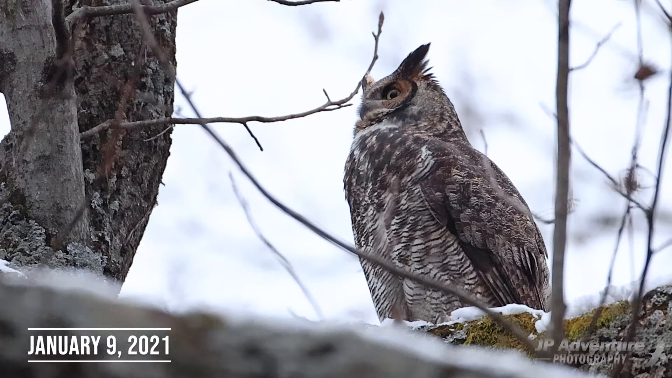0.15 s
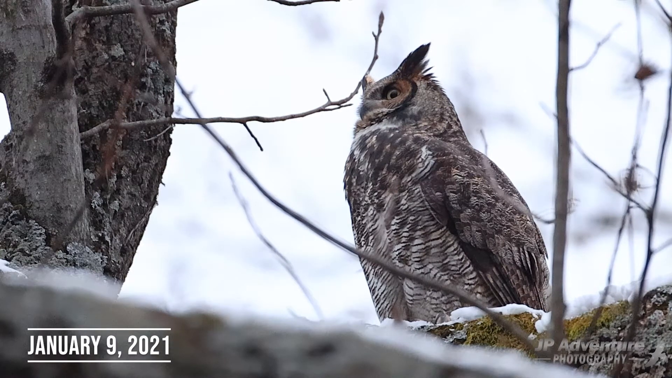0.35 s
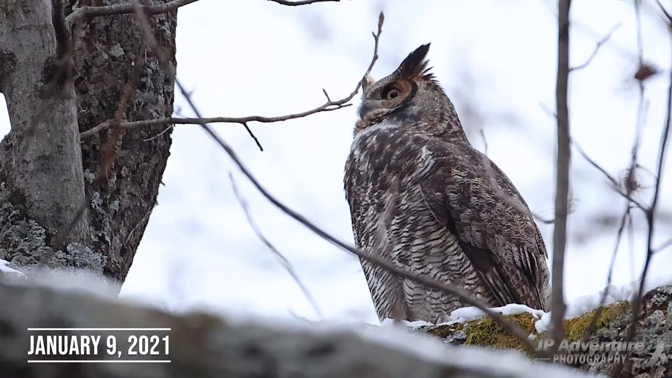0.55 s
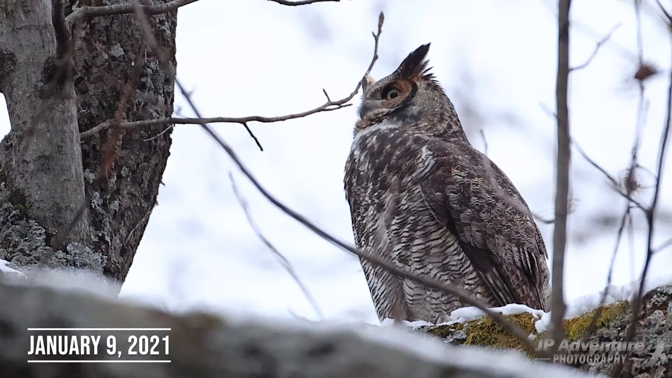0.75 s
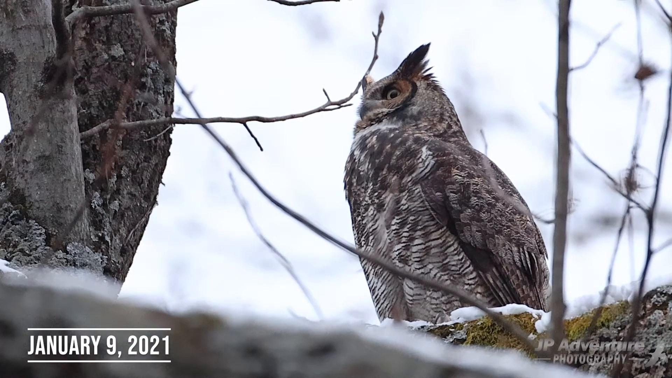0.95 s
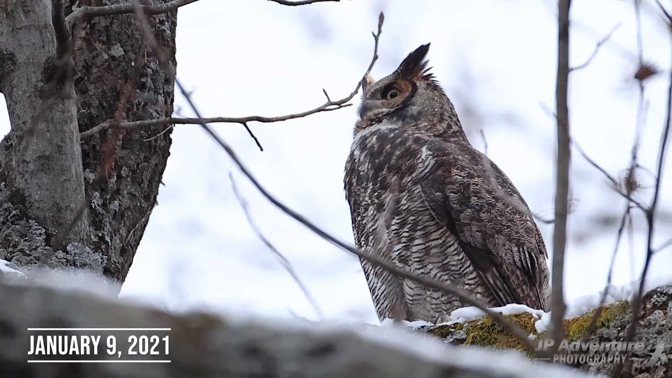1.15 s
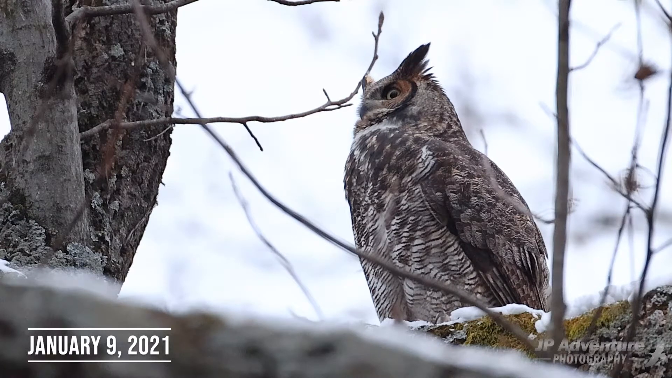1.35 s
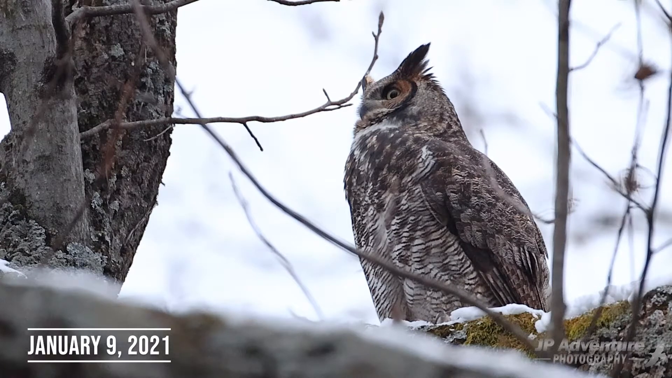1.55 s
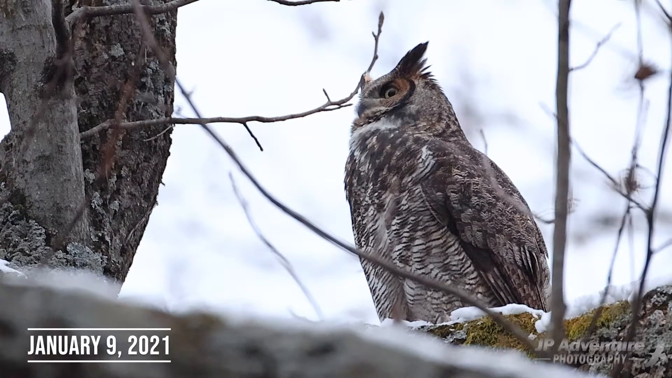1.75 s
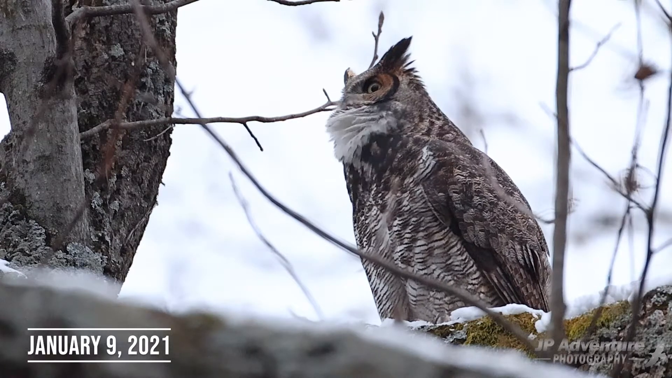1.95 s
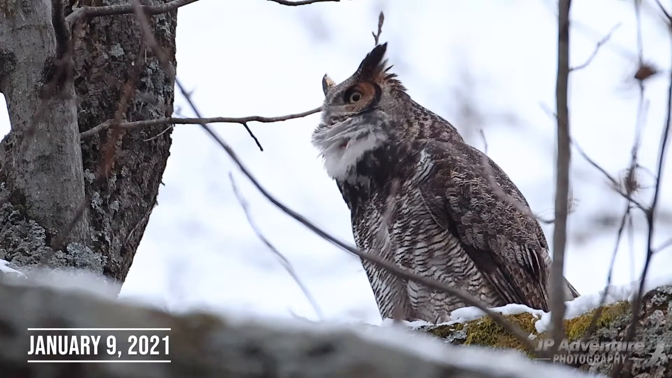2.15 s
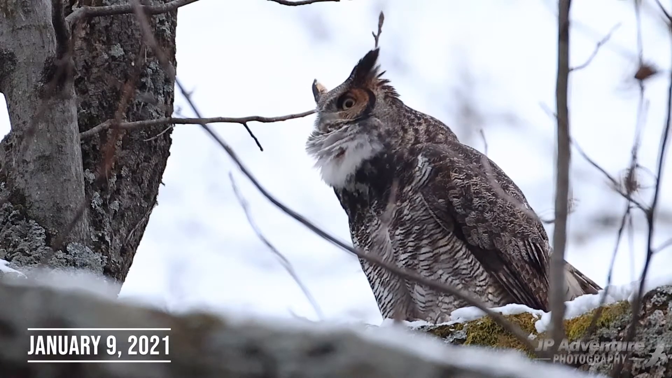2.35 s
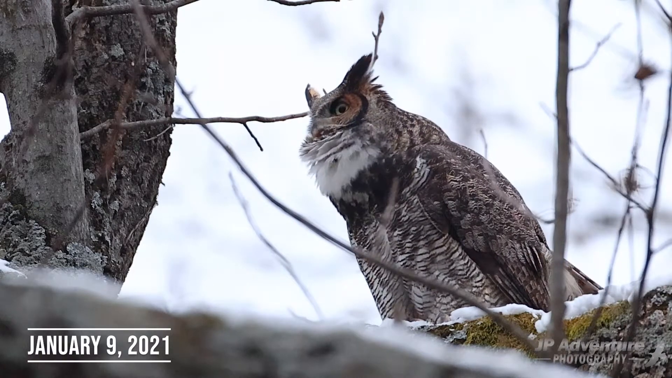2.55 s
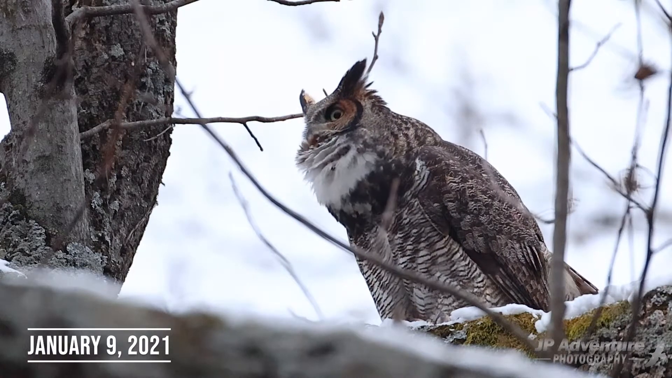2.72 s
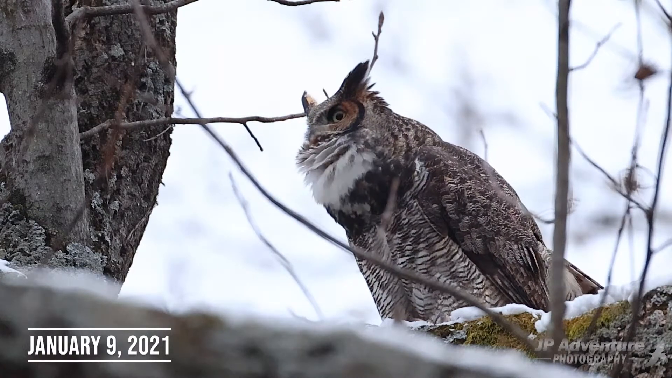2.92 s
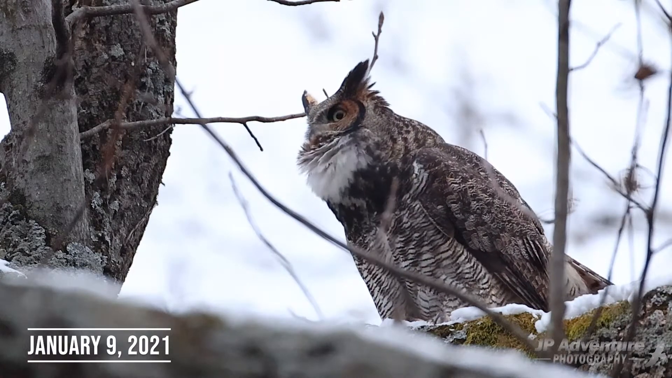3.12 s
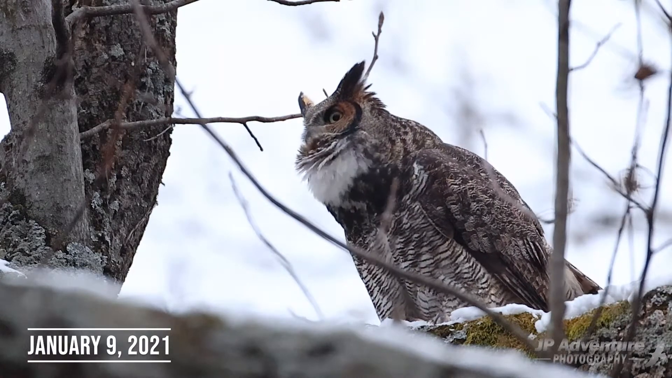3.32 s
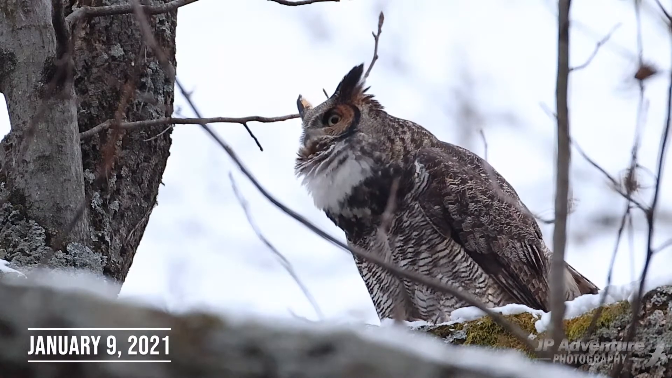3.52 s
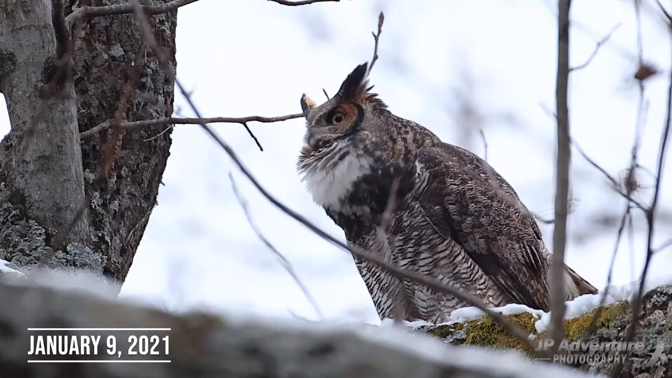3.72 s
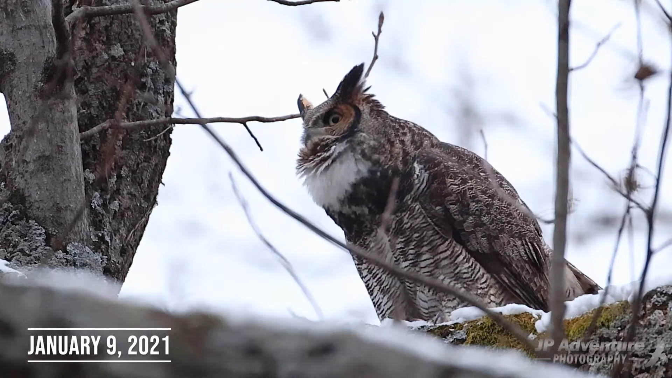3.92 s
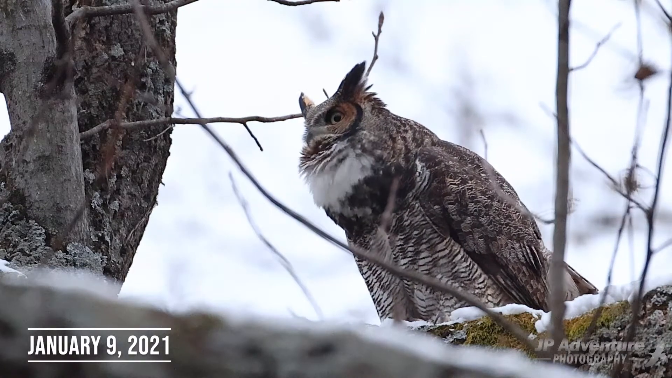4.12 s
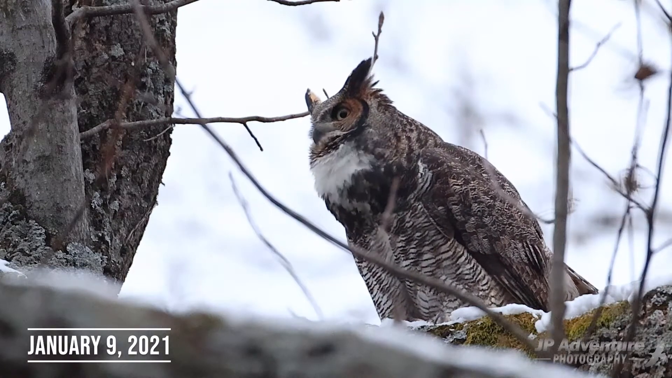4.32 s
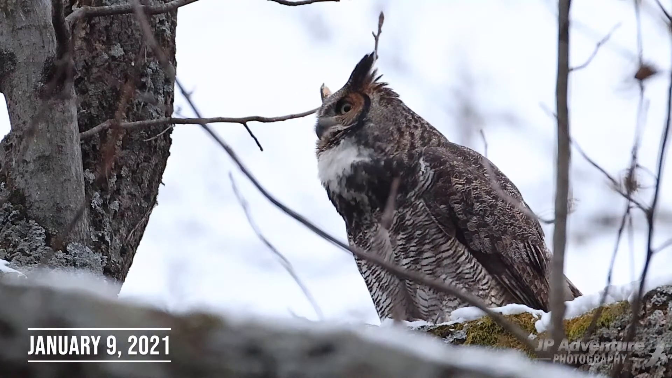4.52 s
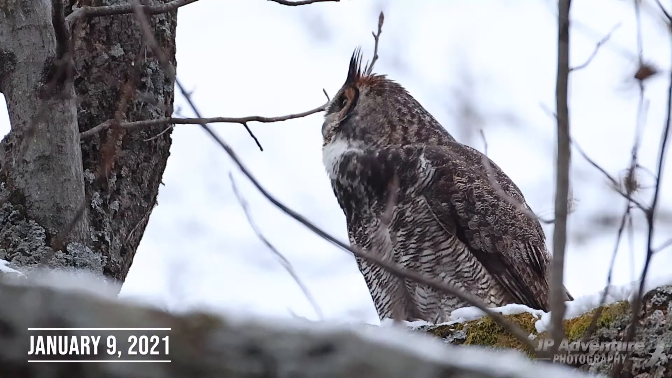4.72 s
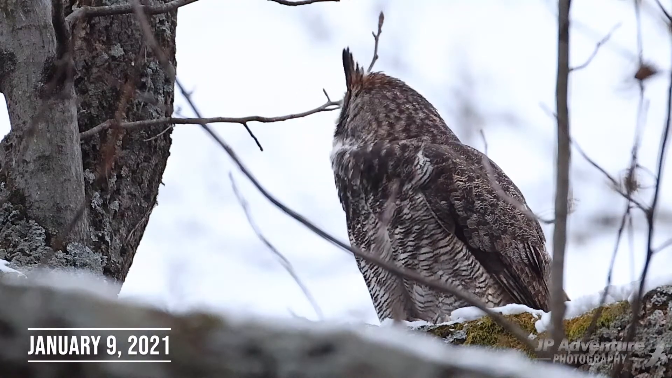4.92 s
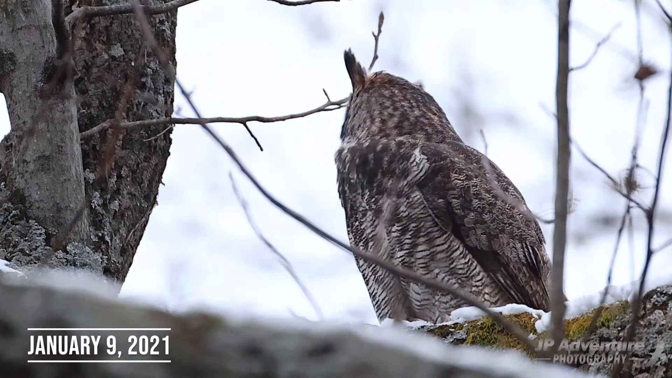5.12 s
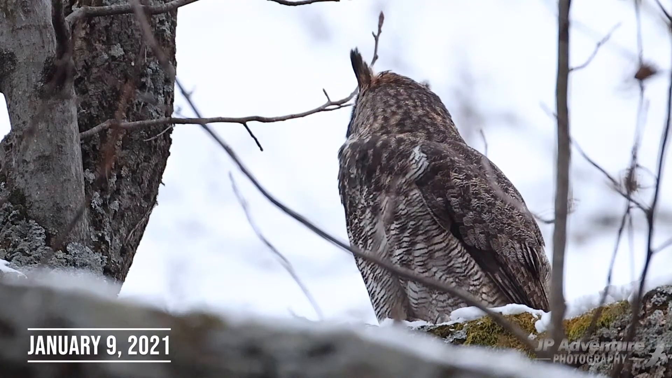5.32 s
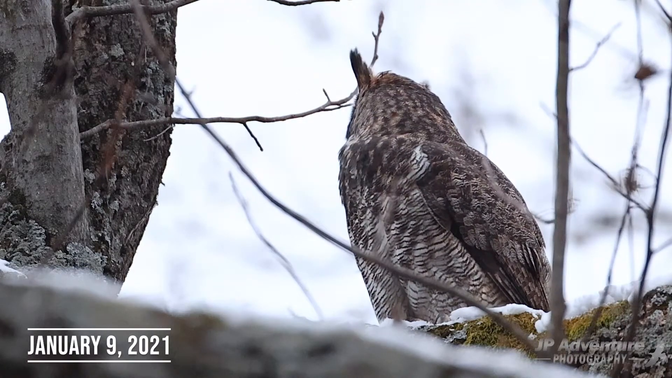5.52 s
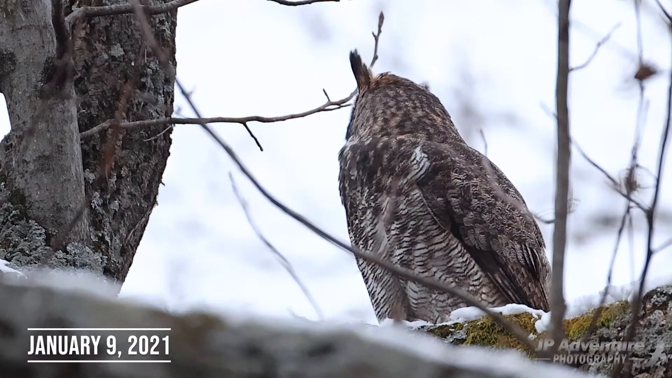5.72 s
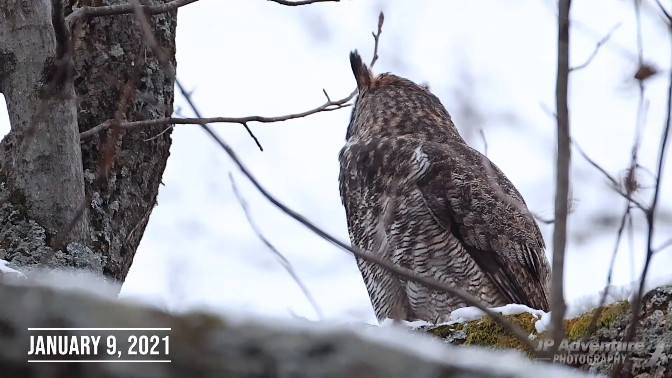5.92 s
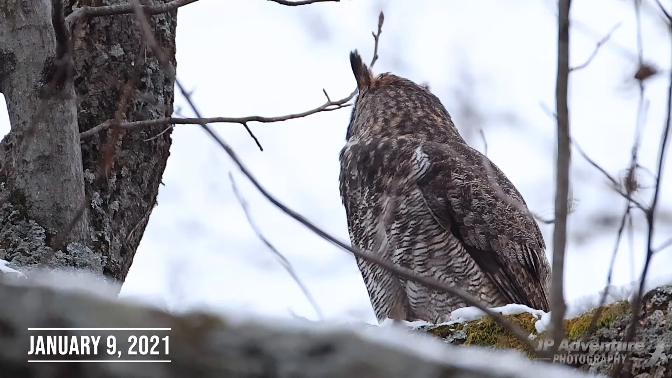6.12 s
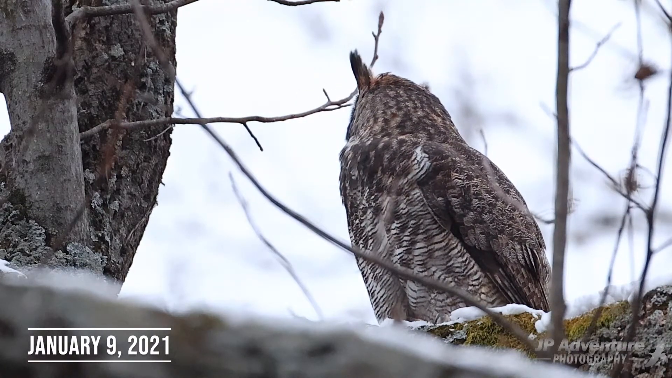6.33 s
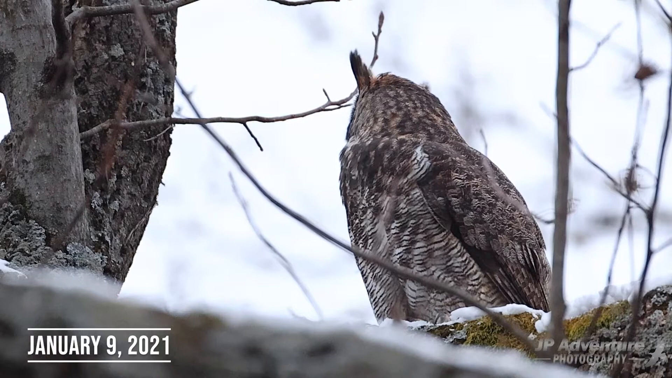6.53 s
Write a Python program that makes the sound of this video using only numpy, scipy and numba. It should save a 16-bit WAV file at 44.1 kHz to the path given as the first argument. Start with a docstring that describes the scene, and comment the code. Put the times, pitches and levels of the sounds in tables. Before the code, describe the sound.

An owl gives a run of deep, mellow hoots in the woods while twigs and ice crack over faint, faraway traffic.

```python
"""In snowy woods, a great horned owl hoots one phrase of seven notes from a branch.
Each hoot is a nearly pure tone, driven by pushes of air and coloured by the resonance of the throat.
Twigs and ice snap and ring, a small bird calls twice far off, and the trees scatter these sounds back.
Behind them lie a distant wash of air and traffic, a low hum, puffs of breeze and one dry click.
An automatic gain control pushes the wash down under each hoot and lets it swell back."""
import sys
import numpy as np
from scipy import signal
from scipy.fft import rfft, irfft
from scipy.io import wavfile
from scipy.ndimage import uniform_filter1d
from numba import njit

SR = 44100
rng = np.random.default_rng(int(sys.argv[2]) if len(sys.argv) > 2 else 0)


def master_out(mix):
    """Clip the mix to full scale and print it as 16-bit PCM to the path in sys.argv[1]."""
    frames = np.transpose(np.atleast_2d(mix))
    ceiling = np.clip(frames, -1, 1)
    pcm = np.round(ceiling * 32767).astype(np.int16)
    wavfile.write(sys.argv[1], SR, pcm)


N = 294147
TIME = np.arange(N) / SR
WASH_DB = -28.5


def gain_of(db):
    """Amplitude ratio of a level in decibels."""
    return 10 ** (np.asarray(db) / 20)


def unit_rms(x):
    """Normalisation to unit mean power."""
    return x / np.sqrt(np.mean(x ** 2) + 1e-20)


def add(mix, start_s, sound):
    """Superposition: a sound sums into the mix from its start time."""
    part = mix[round(start_s * SR):][:len(sound)]
    part += sound[:len(part)]


def band(x, low_hz, high_hz, order=2):
    """Causal band-pass, its upper edge held below half the sample rate."""
    edges_hz = [low_hz, min(high_hz, SR * .49)]
    return signal.sosfilt(signal.butter(order, edges_hz, "band", fs=SR, output="sos"), x)


def drift(size, rate_hz):
    """Random modulation: low-passed noise of about unit rms."""
    hz = np.fft.rfftfreq(N, 1 / SR)
    spectrum = rfft(rng.standard_normal(N)) / (1 + (hz / rate_hz) ** 4)
    return unit_rms(irfft(spectrum, N))[:size]


def woods(x, t60_s, rise_s, dull_hz=11500):
    """Multiple scattering by branches: sparse reflections build up, then decay, the treble first."""
    taps = rng.standard_normal(SR) * (rng.random(SR) < 8000 / SR)  # about 8000 reflections a second
    taps *= 1 - np.exp(-TIME[:SR] / rise_s)
    hz, t, spectra = signal.stft(taps, SR, nperseg=128)
    decay_db = -60 * t / t60_s * (1 + (hz[:, None] / dull_hz) ** 3)
    response = signal.istft(spectra * gain_of(decay_db), SR, nperseg=128)[1]
    return signal.fftconvolve(x, response / np.linalg.norm(response))[:N]


def wash(patchy_db=.82, swell_db=-.34):
    """Ambient noise of far air and traffic: a dull spectrum with drifting patches below, hiss above."""
    # noise spectrum ahead of the band-pass: (frequency [Hz], relative spectral density [dB])
    wash_spectrum = [(22, -31.5), (33, -24.5), (46, -11.5), (62, -0.5), (100, -0.5), (200, -9),
                     (400, -12.5), (630, -10), (960, -10.5), (1410, -18), (2000, -27.5), (2700, -37.5),
                     (6700, -41), (15500, -45)]
    knot_hz, knot_db = np.transpose(wash_spectrum)
    frames, hz = N // 512 + 5, np.fft.rfftfreq(2048, 1 / SR)
    real, imag, patches = rng.standard_normal((3, frames, len(hz)))
    patches = uniform_filter1d(patches, size=10, axis=0)  # smooth in time
    patches = unit_rms(uniform_filter1d(patches, size=12, axis=1))  # and in frequency
    density_db = np.interp(np.log(hz + 1), np.log(knot_hz), knot_db)
    field_db = density_db + patchy_db * patches / (1 + (hz / 2500) ** 2)
    spectra = (real + 1j * imag) * gain_of(field_db)
    noise = signal.istft(spectra.T, nperseg=2048, noverlap=1536)[1][:N]
    return gain_of(WASH_DB + swell_db * drift(N, 6.3)) * unit_rms(band(noise, 50, 20000, order=3))


def drone(hz=95, width_hz=9, db=-41):
    """Narrow-band noise: random amplitude modulation makes a low tone waver like a far road."""
    return gain_of(db) * np.sqrt(2) * drift(N, width_hz) * np.sin(2 * np.pi * hz * TIME)


def breeze(low_hz=38, high_hz=165):
    """Turbulent pressure on the microphone: low noise in soft, bell-shaped buffets."""
    # puffs of air: (time [s], standard deviation in time [s], level [dB])
    puffs = [(5.133, 0.047, -44), (5.243, 0.035, -26), (5.484, 0.028, -28), (5.605, 0.14, -40.5)]
    strength = sum(gain_of(db) * np.exp(-((TIME - s) / width) ** 2 / 2) for s, width, db in puffs)
    return strength * unit_rms(band(rng.standard_normal(N), low_hz, high_hz, order=3))


def far_bird(arch=.22, hoarse=.077, direct_db=-4, scatter_gain=2):
    """Frequency modulation gives a hoarse, arched note; far off, scattered sound outweighs direct."""
    # calls: (time [s], duration [s], pitch [Hz], level before the path gains [dB])
    chirps = [(1.142, 0.023, 3600, -47), (6.153, 0.041, 3495, -46.5)]
    out = np.zeros(N)
    for start, length, hz, db in chirps:
        arc = np.sqrt(abs(np.sin(np.linspace(0, np.pi, int(length * SR)))))
        pitch_hz = hz * (1 + arch * (arc - .8) + hoarse * drift(len(arc), 300))
        note = gain_of(db) * np.sqrt(2) * arc * np.sin(2 * np.pi * np.cumsum(pitch_hz) / SR)
        add(out, start, gain_of(direct_db) * note)
        add(out, start, scatter_gain * woods(note, t60_s=.58, rise_s=.005))
    return out


def pop(start_s=1.2712, peak_db=-.38, decay_s=.00063):
    """A discontinuity heard as one dry click: a step in the signal dies away at once, with no echo."""
    out = np.zeros(N)
    add(out, start_s, -gain_of(peak_db) * np.exp(-TIME[:400] / decay_s))
    return out


def faint_ticks(per_s=.8, peak_db=-35.5, spread_db=1, ring_hz=4000, top_hz=7500):
    """A random point process: small breaks, their main rings spread over an octave, as rows for snaps."""
    second_hz, splinter_db, wet_db = (ring_hz + top_hz) / 2, -14, -6
    draws = rng.random((round(per_s * N / SR), 3))
    return [(when * N / SR, peak_db - spread_db * softness, ring_hz * 2 ** (octaves - .5),
             second_hz, top_hz, splinter_db, wet_db) for when, softness, octaves in draws]


def snaps(low_hz=1450, ring_q=2.6, second_gain=.2, crack_gain=.17, bite_db=-18, splinter_s=.0026):
    """Impulse excitation: each fracture and its spray of splinters ring two damped modes."""
    # breaking twigs and ice: (time [s], peak level [dB], main mode [Hz], second mode [Hz],
    # upper band edge [Hz], relative splintering [dB], relative scatter from the trees [dB])
    breaks = [(.2155, -28, 4250, 7000, 8500, -13, -13), (1.9261, 4, 3390, 2680, 7090, -14.5, -10),
              (2.030, -13, 5010, 6500, 7450, -17, 1), (2.0401, .5, 5800, 4320, 7030, -21, -14),
              (2.6076, -24.5, 7000, 12060, 14900, -12, -12.5), (2.8676, 13, 3100, 7210, 9870, -11, -9.5),
              (3.3539, -26.5, 3220, 5540, 7830, -11.5, 5.5), (3.4005, 1.5, 3300, 5743, 7750, -16, -10.5),
              (4.188, -28.5, 3532, 6510, 7450, -9, 0.5), (4.2518, -21.5, 4440, 6400, 7350, -18.5, -2),
              (4.881, -18.5, 2720, 3097, 4000, -13, -9), (4.9012, -7.5, 2843, 4382, 12060, -17.5, -5.5),
              (5.0038, -26, 3910, 7000, 8020, -16, -2), (5.5581, -24, 3100, 6040, 7940, -3, 4.5),
              (5.569, -26.5, 6000, 3500, 7640, -10, 5.5), (6.2902, -26.5, 2750, 6500, 7540, -13, -3)]
    out, t = np.zeros(N), TIME[:1500]
    for start, db, ring_hz, second_hz, top_hz, splinter_db, wet_db in breaks + faint_ticks():
        force = gain_of(splinter_db) * .5 * rng.standard_normal(len(t)) * np.exp(-t / splinter_s)
        force[0] = 1  # the fracture itself
        main = signal.lfilter(*signal.iirpeak(ring_hz, ring_q, fs=SR), force)
        second = signal.lfilter(*signal.iirpeak(second_hz, ring_q, fs=SR), force)
        snap = band(main + second_gain * second + crack_gain * force, low_hz, top_hz, order=7)
        snap += gain_of(bite_db) * crack_gain * band(force, 11000, SR / 2)  # the break's sharp edge
        snap *= gain_of(db) / abs(snap).max()
        add(out, start, snap)
        add(out, start, gain_of(wet_db) * woods(snap, t60_s=.24, rise_s=.005))
    return out


def syllable(length, hz, climb_hz, effort_db, tilt_db, octave_db):
    """One push of air: tension lifts the pitch from rest and purifies the tone as the level arches."""
    attack_s, release_s, edge_db = .027, .029, -17
    rest_hz, rise_s, fall_s, slack_db = 224.1, .02, .03, 14
    t = np.arange(0, length, 1 / SR)
    left, along = length - t, t / length - .5
    edges = np.exp(-(t / attack_s) ** 2) + np.exp(-(left / release_s) ** 2)
    gate = np.minimum(np.minimum(t, left) / .005, 1)
    strength = gate * gain_of(effort_db + tilt_db * along + edge_db * edges)
    tension = (1 - np.exp(-(t / rise_s) ** 2)) * (1 - np.exp(-(left / fall_s) ** 2))
    pitch_hz = rest_hz + (hz + climb_hz * along - rest_hz) * tension
    overtone_db = octave_db + slack_db * (1 - tension)
    return np.transpose([strength, strength * pitch_hz, strength * overtone_db])


def phrase():
    """Pitch glide: overlapping syllables slur into one hoot; the loudness flutters as two hoots end."""
    # the owl's syllables: (time [s], duration [s], pitch [Hz], pitch climb [Hz], effort [dB],
    # level change across the syllable [dB], octave relative to the fundamental [dB])
    syllables = [(0.752, 0.12, 278.7, -2.5, -9, 1, -27), (1.126, .13, 280.6, -13, -8, 0.5, -25.5),
                 (1.241, .285, 300, 19, -6.5, 1, -32), (1.485, .103, 294.2, 0, -12.5, -3, -29),
                 (2.203, 0.12, 300, -4, -12.5, -1.5, -11), (2.285, 0.073, 265.3, 1.5, -9.5, -3, -11.5),
                 (2.314, .312, 280, -1.5, -7, 1, -22), (2.582, .13, 305.3, -1.5, -2.9, -5, -27.5),
                 (2.75, 0.14, 320, 1, -1, 0, -35), (2.827, 0.27, 381.1, 41, -1.5, -6, -36),
                 (3.114, 0.25, 277.3, 1, -10, 0.5, -30), (3.497, .122, 318.3, -3.5, -4.5, 0.5, -29),
                 (3.562, 0.11, 341, 0.5, -7.5, -0.5, -36), (3.614, .241, 370.3, 31, -0.8, -8.5, -34.5),
                 (4.085, .175, 318.4, -2, -4, 1, -35), (4.191, .152, 359.6, -2, -2, 0, -32),
                 (4.327, .1, 339.3, 3, -14, -3, -26)]
    # brief flutters, like a tone beating with its echo: (time [s], half width [s], rate [Hz], depth [0-1])
    flutters = [(2.635, 0.032, 38.3, .55), (4.394, .05, 27.2, 0.5)]
    total = np.zeros((N, 3))
    for start, *shape in syllables:
        add(total, start, syllable(*shape))
    strength = total[:, 0]
    hz, overtone_db = total[:, 1:].T / (strength + 1e-20)  # means weighted by strength
    for centre, half_width, rate_hz, depth in flutters:
        t = TIME - centre
        window = np.exp(-(t / half_width) ** 2)
        strength = strength * (1 + depth * window * np.cos(2 * np.pi * rate_hz * t))
    return strength, hz, overtone_db


def hoots(jitter=.005, shimmer=.04, rasp=.54, third_db=-21, windpipe_hz=2600, whistle_db=-53):
    """Source and filter: a nearly pure tone with rough overtones slides through the throat's resonance."""
    throat_hz, half_width_hz, boost_db = 340, 16, 2.5
    strength, hz, overtone_db = phrase()
    phase = 2 * np.pi * np.cumsum(hz * (1 + jitter * drift(N, 70))) / SR
    overtones = gain_of(overtone_db) * (np.sin(2 * phase) + gain_of(third_db) * np.sin(3 * phase))
    tone = np.sin(phase) + overtones * (1 + rasp * drift(N, 60))
    # high partials sound faintly as they cross a resonance of the windpipe
    for k in range(7, 10):
        tone += gain_of(whistle_db) * np.sin(k * phase) / (1 + ((k * hz - windpipe_hz) / 150) ** 2)
    throat_db = boost_db / (1 + ((hz - throat_hz) / half_width_hz) ** 2)
    return tone * np.sqrt(2) * strength * gain_of(throat_db) * (1 + shimmer * drift(N, 50))


def owl(wet_db=-27):
    """Multipath propagation: the hoots arrive directly, as discrete echoes and as a soft diffuse tail."""
    # reflections from trunks and slopes: (delay [s], relative level [dB])
    echoes = [(.062, -21.5), (0.106, -30.5), (.142, -29), (.27, -38.5)]
    voice = hoots()
    out = voice + gain_of(wet_db) * woods(voice, t60_s=1.3, rise_s=.06)
    for delay, db in echoes:
        add(out, delay, gain_of(db) * voice)
    return out


def scene():
    """Linear superposition of all sources at one microphone."""
    return (owl() + snaps() + pop() + far_bird() + wash() + drone() + breeze())[None]


@njit
def follow(level, start, attack, release):
    """Envelope detection: a leaky integrator with attack and release time constants in samples."""
    out, held = np.empty(len(level)), start
    for i in range(len(level)):
        held += (level[i] - held) / (attack if level[i] > held else release)
        out[i] = held
    return out


def record(dry):
    """Dynamic compression by a slow gain control, then clipping of the highest peaks and a low-pass."""
    threshold_db, cut_per_db, attack_s, release_s = -26, .6, .12, .3
    ceiling, cutoff_hz = .88, 15900
    rms = np.sqrt(abs(uniform_filter1d(dry[0] ** 2, size=220)))
    held = follow(rms, float(gain_of(WASH_DB)), attack_s * SR, release_s * SR)
    excess_db = np.maximum(20 * np.log10(held) - threshold_db, 0)
    ducked = dry * gain_of(-cut_per_db * excess_db)
    clipped = np.clip(ducked, -ceiling, ceiling)
    low_pass = signal.firwin(511, cutoff_hz, window=("kaiser", 9), fs=SR)
    return signal.oaconvolve(clipped, low_pass[None], "same")


dry = scene()
out = record(dry)
master_out(out)
```